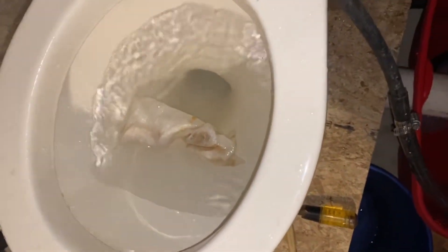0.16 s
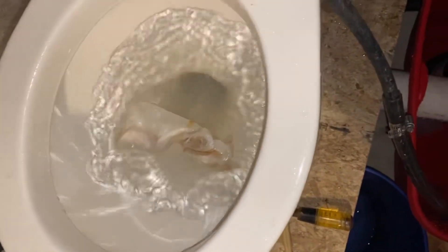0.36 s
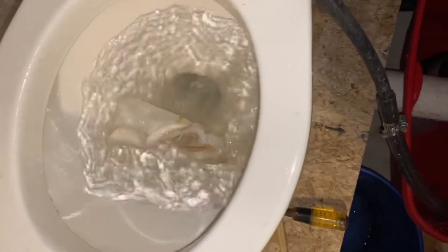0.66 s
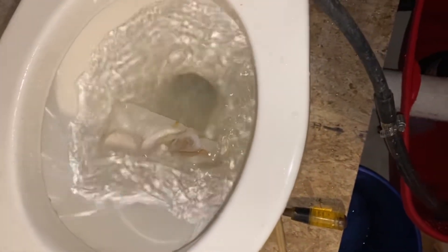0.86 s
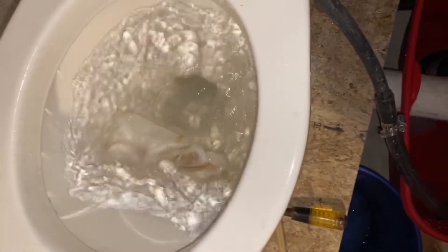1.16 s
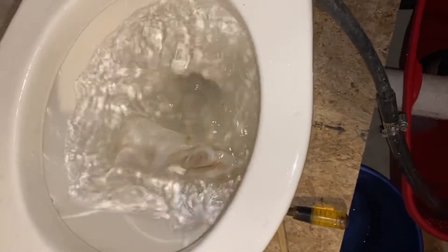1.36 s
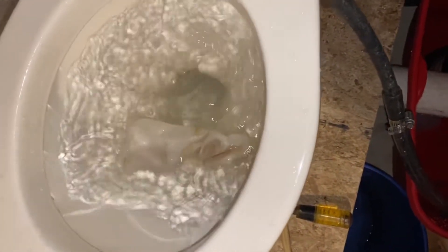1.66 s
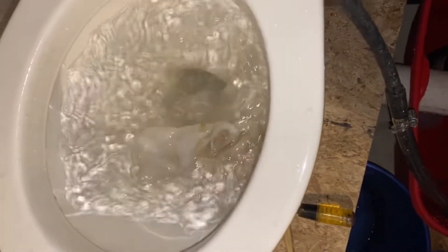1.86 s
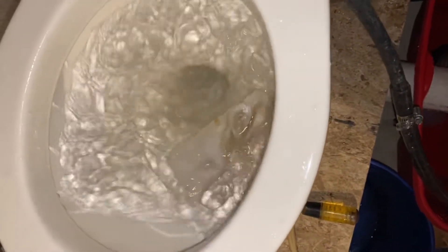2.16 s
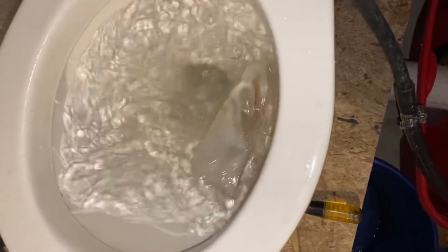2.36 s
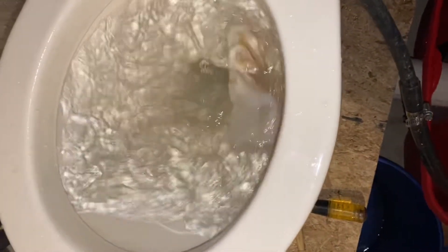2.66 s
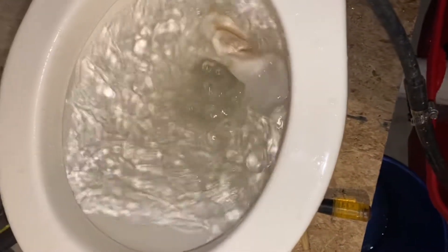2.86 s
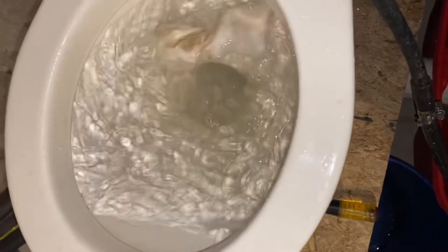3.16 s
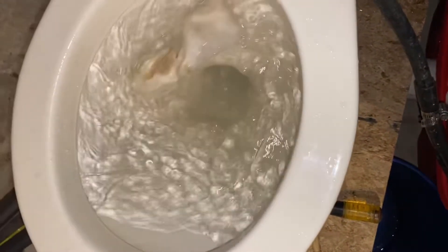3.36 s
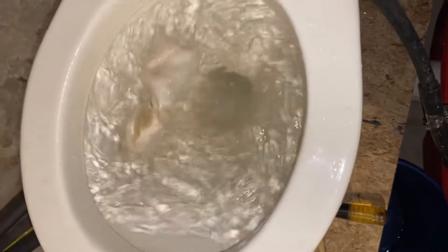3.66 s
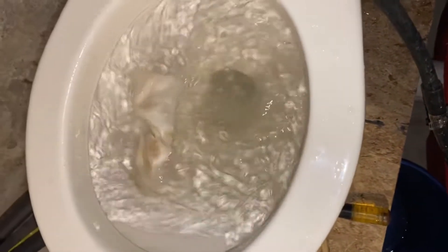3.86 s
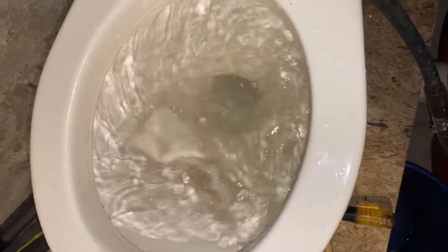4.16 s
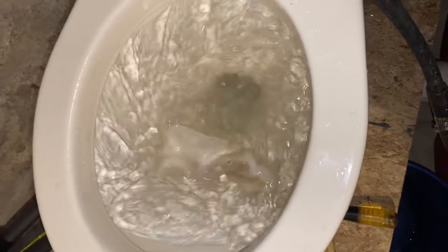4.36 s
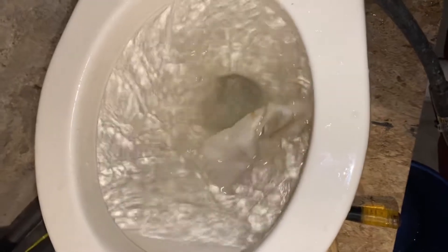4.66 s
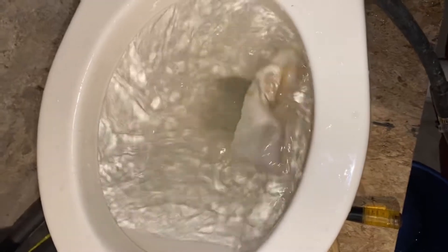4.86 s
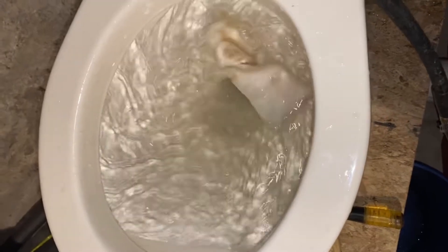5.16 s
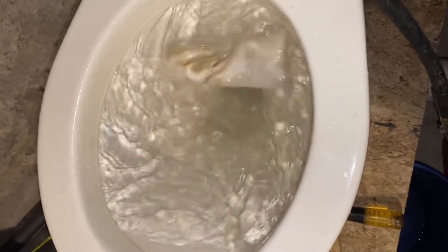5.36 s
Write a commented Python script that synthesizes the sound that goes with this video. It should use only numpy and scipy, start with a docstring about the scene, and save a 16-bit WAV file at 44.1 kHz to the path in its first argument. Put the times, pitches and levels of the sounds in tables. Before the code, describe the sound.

Close above a toilet bowl, a flush starts with fizzing water and rushing air in the rim that stops just after one second. Rough, throaty groans and gurgles come in bursts until about two and a half seconds, with splashes and slaps. Then a steadier hiss and trickle remain, with small bright bubbles and plops. A faint low machine hum lies underneath; the stereo is wide and the room small and short.

```python
"""A toilet flushes, heard by two microphone ports just above the bowl, over the faint mains hum of a machine.
From the start rim water washes down the china as fizzing noise, while the pool trickles and the bowl drones
low. In fits the stream drags air under: summed pulse partials groan roughly in the long spells, clouds of
ringing bubbles gurgle in the rest, and single bubbles plop; decaying bursts of small bubbles and noise splash
and slap. Air rushing through the rim dies away soon after one second; as the bowl fills, small bright bubbles
take over."""
import sys
import numpy as np
from scipy import signal
from scipy.fft import rfft, irfft, next_fast_len
from scipy.io import wavfile
from scipy.ndimage import uniform_filter1d

SR = 44100
rng = np.random.default_rng(int(sys.argv[2]) if len(sys.argv) > 2 else 0)


def generate_wav(signal):
    """Clip the signal to [-1, 1] and save it as 16-bit WAV at the path in sys.argv[1]."""
    frames = np.transpose(np.atleast_2d(signal))
    scaled = np.clip(frames, -1, 1) * 32767
    pcm = np.round(scaled).astype(np.int16)
    wavfile.write(sys.argv[1], SR, pcm)


N = 243431

# filling of the bowl: time_s, water_level [0-1]
WATER_LEVEL = [(0, 0), (2.2, 0.01), (3.6, 0.96), (5.52, 0.99)]
# resonances of the hollow rim channel: pitch_hz, width_hz, gain_db
RIM_CHANNEL = [(1827, 52, -3), (2215, 51, 8), (3200, 92, -10), (3480, 37, -4), (3760, 88, -3.5),
               (4020, 60, -7), (4400, 210, -5.5), (5900, 300, -18), (6500, 400, -16)]


def from_db(db):
    """Decibels to gain."""
    return np.exp(np.asarray(db) * (np.log(10) / 20))


def rms_one(x):
    """Scale to unit power."""
    return x / np.sqrt(np.mean(x ** 2) + 1e-20)


def evened(x, size=2400):
    """Hold the power of both ports at one over a sliding window of size samples; the quicker grain stays."""
    power = uniform_filter1d(np.mean(x ** 2, axis=0), size)
    return x / np.sqrt(np.maximum(power, 1e-9))


def in_time(rows):
    """The columns of a curve, read at every sample."""
    s, *columns = np.transpose(rows)
    return np.array([np.interp(np.arange(N) / SR, s, column) for column in columns])


def at_hz(points, hz):
    """Read a curve on a log-frequency axis."""
    point_hz, value = np.transpose(points)
    return np.interp(np.log(np.maximum(hz, 1)), np.log(point_hz), value)


def drift(rate_hz):
    """Slow chance with spread 1: noise through a two-pole low-pass, run at one sample in 40."""
    r = np.exp(-80 * np.pi * rate_hz / SR)
    chance = rng.standard_normal(N // 40 + 2002)
    slow = signal.lfilter([1], [1, -2 * r, r * r], chance)[2000:]   # past the filter's run-in
    return np.interp(np.arange(N) / 40, np.arange(len(slow)), rms_one(slow))


def band(x, low_hz, high_hz, order=2):
    """Butterworth band-pass."""
    edges_hz = [low_hz, min(high_hz, SR / 2 - 100)]
    return signal.sosfilt(signal.butter(order, edges_hz, "band", fs=SR, output="sos"), x)


def resonate(x, modes):
    """Parallel two-pole resonances, each with its own gain, fixed or changing in time."""
    out = 0
    x = x + 1e-12 * rng.random(N)   # keeps the filters off vanishing numbers
    for hz, width_hz, gain in modes:
        r = np.exp(-np.pi * width_hz / SR)
        zeros = np.array([1, 0, -1]) * (1 - r * r) / 2
        poles = [1, -2 * r * np.cos(2 * np.pi * hz / SR), r * r]
        out = out + gain * signal.lfilter(zeros, poles, x)
    return out


def as_modes(rows):
    """Resonances with their dB turned to gain."""
    return [(hz, width_hz, from_db(db)) for hz, width_hz, db in rows]


def add(track, at, sound):
    """Mix a sound into a track from sample at."""
    track[at:at + len(sound)] += sound[:N - at]


def bursts(rows, decay_s):
    """An envelope that jumps at each (time_s, level_db) and falls by a factor e in decay_s."""
    blows = np.zeros(N)
    for s, db in rows:
        blows[min(int(s * SR), N - 1)] += from_db(db)
    return signal.lfilter([1], [1, -np.exp(-1 / (decay_s * SR))], blows + 1e-12)


def bubble(hz, cycles, rise):
    """A bubble rings down 60 dB in so many cycles, its pitch rising as it nears the surface."""
    age = np.arange(int(cycles * SR / hz) + 2) * hz / (cycles * SR)   # 1 when it has rung down
    return np.exp(-np.log(1000) * age) * np.sin(2 * np.pi * cycles * (age + rise * age ** 2 / 2))


def cloud(per_s, low_hz, high_hz, cycles, rise, spread_db):
    """Bubbles of 96 sizes born at random moments, a few much stronger than the rest."""
    born = np.flatnonzero(rng.random(N) < per_s / SR)
    excess = np.minimum(rng.exponential(1, N), 4)
    strength = from_db(spread_db * excess) * rng.choice([-1, 1], N)
    rings = [bubble(hz, cycles, rise) for hz in np.geomspace(low_hz, high_hz, 96)]
    size = rng.integers(0, len(rings), N)
    out = np.zeros(N)
    for at in born:
        add(out, at, strength[at] * rings[size[at]])
    return rms_one(out)


def room(x, wet_db, t60=0.077):
    """Direct sound plus dense reflections that die 60 dB in t60 seconds, different at each port."""
    t = np.arange(SR // 2) / SR
    tail = rng.standard_normal((2, len(t))) * from_db(-60 * t / t60) * (t > .001)
    tail /= np.sqrt(np.sum(tail ** 2, axis=1, keepdims=True))
    return x + from_db(wet_db) * signal.fftconvolve(x[None], tail, axes=1)[:, :N]


def water_level():
    """How full the bowl is at every sample, from 0 to 1."""
    return np.clip(in_time(WATER_LEVEL)[0], 0, 1)


def in_bowl(x, direct_db, wet_db):
    """Sound from the pool rings the hollow of the bowl, whose colour changes as it fills, and spills into the room."""
    # air resonances of the bowl: pitch_hz, width_hz, low_water_db, high_water_db
    bowl_air = [(248, 14, -7.5, -24), (345, 150, 0, 0.5), (436, 52, 0, 0.5), (729, 32.4, 11.5, -52),
                (775.6, 43, -35, 7), (1113.6, 20, 5, -9), (1287, 74, -2, 5), (1398, 18, 2, 4),
                (1811, 51, 6, -1), (2105, 70, 10.5, 2.5), (2244, 160, -16, 2), (2460, 200, 5, -2),
                (3130, 15, -10, -8), (3350, 73, 0, -1), (3730, 81, -23, -9), (4345, 83, 3, 2.5)]
    fill = water_level()
    modes = [(hz, width_hz, (1 - fill) * from_db(low_db) + fill * from_db(high_db))
             for hz, width_hz, low_db, high_db in bowl_air]
    return room(resonate(x, modes) + from_db(direct_db) * x, wet_db)


def hum():
    """Steady sine lines of a machine in the room, sent alike to both ports."""
    # lines of the hum: pitch_hz, level_db (rms)
    lines = [(120, -47.5), (174, -51), (240, -39)]
    t = np.arange(N) / SR
    return sum(np.sqrt(2) * from_db(db) * np.sin(2 * np.pi * (hz * t + rng.random())) for hz, db in lines)


def swirl():
    """The turning pool trickles and plinks all the while, and the flow keeps the hollow of the bowl droning
    low."""
    # resonances of the low drone: pitch_hz, width_hz, gain_db
    drone_modes = [(61, 40, -5), (155, 30, 3), (205, 48, -2.5), (249.3, 18.5, 6)]
    trickle = cloud(per_s=300, low_hz=640, high_hz=2640, cycles=40, rise=.16, spread_db=3.8)
    plinks = cloud(per_s=60, low_hz=850, high_hz=5000, cycles=75, rise=.22, spread_db=2.8)
    drone = band(resonate(rng.standard_normal(N), as_modes(drone_modes)), 60, 340, order=3)
    return (from_db(-40.5) * rms_one(in_bowl(trickle, direct_db=-22, wet_db=4.5))
            + from_db(-41.5) * rms_one(room(plinks, wet_db=7))
            + from_db(-39.5) * evened(room(drone, wet_db=-3.5), size=9000))


def film_hiss(flicker_db, flutter_db):
    """The sheet of water on the china: half-octave noise bands that flutter together and flicker alone."""
    # colour of the hiss: pitch_hz, level_db (each band's noise, before the whole is scaled)
    hiss_colour = [(30, -30), (100, -13), (350, -17), (600, 7.5), (1200, 7.5), (2500, 5), (4200, 3.5),
                   (6500, 1.5), (8500, -1.5), (11000, -5.5), (13500, -5), (16000, -8)]
    # likeness of the hiss at the two ports: pitch_hz, likeness [0-1]
    port_likeness = [(60, .93), (300, 0.82), (600, 0.18), (2000, 0.66), (5400, 0.13), (6600, 1),
                     (16000, 0.96)]
    out = 0
    together = drift(25)
    edges_hz = 22 * 2 ** np.arange(0, 10, .5)
    white = rng.standard_normal((2, 2, N))   # neighbouring bands take turns with two pairs of noise
    for k, (low_hz, high_hz) in enumerate(zip(edges_hz, edges_hz[1:])):
        mid, side = band(white[k % 2], low_hz, high_hz)
        hz = np.sqrt(low_hz * high_hz)
        alike = np.clip(at_hz(port_likeness, hz), 0, 1)
        gain = from_db(at_hz(hiss_colour, hz) + flutter_db * together + flicker_db * drift(46))
        out = out + gain * (np.sqrt(1 + alike) * mid + np.sqrt(1 - alike) * side * [[1], [-1]])
    return rms_one(out)


def wash(flow):
    """Running water: film hiss, tinkling splashes, bursting spray and slaps."""
    tinkle = cloud(per_s=1000, low_hz=2750, high_hz=6420, cycles=12.2, rise=0.29, spread_db=7.0)
    spray = cloud(per_s=1300, low_hz=6300, high_hz=15100, cycles=12, rise=0.11, spread_db=2.0)
    tinkling = splashing(flow) * rms_one(in_bowl(tinkle, direct_db=-5.5, wet_db=4.5))
    hiss = from_db(10.5) * flow * film_hiss(flicker_db=5.0, flutter_db=2.2)
    spatter = from_db(3.5) * flow * spray + from_db(-6.0) * slaps(decay_s=0.0051)
    return tinkling + hiss + room(spatter, wet_db=-27)


def rim(flow, flutter):
    """Air and water rush through the hollow rim until it is full, and its jet sizzles while the air flutters."""
    purge_db, fade_db_per_s = 10, 5   # driven-out air relative to the flow, and its steady fading
    full_s, close_s = 1.19, 0.042   # the last air leaves; time to fall by a factor e after that
    jet_db = -46   # before the spurts and the reflections
    t = np.arange(N) / SR
    closing = np.exp(-np.maximum(t - full_s, 0) / close_s)
    purge = flow * from_db(purge_db - fade_db_per_s * t) * closing
    rush = rms_one(resonate(rng.standard_normal(N), as_modes(RIM_CHANNEL)))
    sizzle = rms_one(band(rng.standard_normal(N), 5740, 7500, order=3))
    spurts = from_db(4.9 * drift(22))
    return room(spurts * (purge * rush + from_db(jet_db) * flutter * sizzle), wet_db=0.0)


def spell(length_s, swell_s):
    """A first gulp, a swell towards full strength and a quick release."""
    first_gulp, release_s = 0.34, 0.01   # share of full strength; time to fall by a factor e
    age = np.arange(int((length_s + .1) * SR)) / SR
    swell = 1 - (1 - first_gulp) * np.exp(-age / swell_s)
    onset = np.minimum(age / 0.0015, 1)
    return onset * swell * np.exp(-np.maximum(age - length_s, 0) / release_s)


def trapped_air():
    """Over all spells of air dragged under: strength of the bubbling, of the big bubbles, and share that flutters."""
    # spells: start_s, length_s, swell_s, level_db, big_bubbles_extra_db, flutter_share [0-1 of the power]
    spells = [(0.028, 0.16, 0.024, -22, 7.5, 0.3), (0.19, 0.05, 0.0036, -21, 11, 0.65),
              (0.269, 0.07, 0.0042, -27.5, 3.5, 0.14), (0.395, 0.058, 0.0019, -22, 3.5, 0.37),
              (0.473, 0.079, 0.0077, -28.5, 13, 0.1), (0.549, 0.064, 0.0066, -21, 5.5, 0.2),
              (0.621, 0.54, 0.019, -20.5, 1.5, 0.83), (1.282, 0.055, 0.037, -19, -4.5, 0.3),
              (1.48, 0.019, 0.012, -21.5, -22, 0.14), (1.616, 0.72, 0.074, -20.5, 3, 0.84),
              (2.511, 0.2824, 0.053, -22.5, 3.5, 0.1), (2.942, 0.028, 0.011, -23, 4, 0.14),
              (3.611, 0.097, 0.012, -27, 3, 0.01), (4.235, 0.3, 0.034, -27.5, 3.5, 0.08),
              (4.553, 0.089, 0.0046, -31.5, -26, 0.1), (4.654, 0.057, 0.005, -26.5, -7, 0.06),
              (4.814, 0.017, 0.005, -26.5, -14, 0.02), (5.05, 0.047, 0.0028, -28, -2, 0.1),
              (5.143, 0.125, 0.021, -26.5, -1.5, 0), (5.437, 0.063, 0.005, -30, 1, 0.1)]
    big_grow_s = 0.009   # big bubbles swell more slowly by this much
    air, big_air, share = np.zeros((3, N))
    for s, length_s, swell_s, db, big_db, flutter in spells:
        at, shape = int(s * SR), spell(length_s, swell_s)
        add(air, at, from_db(db) * shape)
        add(big_air, at, from_db(db + big_db) * spell(length_s, swell_s + big_grow_s))
        add(share, at, flutter * shape)
    return air, big_air, np.clip(share, 0, .95)


def flutter_phase(jitter=0.01717):
    """The trapped air pulses at a slightly unsteady rate; the phase sums that rate."""
    # pulse rate, one curve for each long groan: time_s, pulses_per_s
    groan_curves = [
        [(0.03, 280), (0.17, 300), (0.22, 338)],
        [(0.4, 232), (0.45, 260), (0.52, 193), (0.58, 223)],
        [(0.63, 256), (0.68, 274), (0.73, 260), (0.79, 236), (0.84, 269), (0.93, 197), (0.99, 250), (1.04, 225),
         (1.15, 260)],
        [(1.62, 240), (1.69, 211), (1.77, 210), (1.88, 248), (1.95, 236), (2.0, 257), (2.11, 238), (2.17, 227),
         (2.23, 218), (2.35, 274)],
    ]
    rate, = in_time([point for curve in groan_curves for point in curve])
    return 2 * np.pi * np.cumsum(rate * (1 + jitter * drift(73.4))) / SR


def groan(phase, shimmer_db, second_db, slope_db, knee_hz=540):
    """The pulsing air pocket rings the bowl with two strong low partials and weaker overtones."""
    def partial(k):
        """One partial, its level shimmering on its own."""
        return np.sin(k * phase) * from_db(shimmer_db * drift(46))

    low = partial(0.99) + from_db(second_db) * partial(2)
    # quick pulses come out rounder
    low = signal.sosfilt(signal.butter(4, knee_hz, fs=SR, output="sos"), low)
    high = sum(from_db(slope_db * np.log2(k / 3)) * partial(k) for k in range(3, 7))
    low = evened(in_bowl(low, direct_db=-22, wet_db=-42.0))
    high = evened(in_bowl(high, direct_db=-14, wet_db=-11))
    return low, high


def gurgle(air, big_air, share, phase, buzz=0.27, overtone_share=0.32, lumpy_db=2.0):
    """Each spell of trapped air starts abruptly; it groans, or breaks up into three sizes of bubbles."""
    big_db, medium_db = -3.5, -1   # relative to the spell
    small_low_water_db, small_high_water_db = -16.5, 4.5   # small bubbles take over as the bowl fills
    lumps = from_db(lumpy_db * (1 - share) * drift(56))   # air that does not flutter goes under in lumps
    low, high = groan(phase, shimmer_db=3.5, second_db=0.0, slope_db=-14.5)

    big = cloud(per_s=380, low_hz=220.6, high_hz=510, cycles=16.0, rise=0.021, spread_db=4.5)
    big = evened(in_bowl(big, direct_db=-17.5, wet_db=-12))
    big = np.sqrt(1 - share) * big + np.sqrt(share) * low

    medium = cloud(per_s=520, low_hz=657, high_hz=1305, cycles=20.3, rise=0.091, spread_db=1.0)
    medium = evened(in_bowl(medium, direct_db=-12, wet_db=-38))
    clear = share * overtone_share   # the overtones are rougher: more bubbles are left among them
    medium = np.sqrt(1 - clear) * medium + np.sqrt(clear) * high

    small = cloud(per_s=490, low_hz=1520, high_hz=2730, cycles=16.0, rise=0.12, spread_db=4.0)
    small = in_bowl(small, direct_db=-22, wet_db=-7)
    small = evened(small * (1 + buzz * share * np.cos(phase)))   # shed with each pulse
    small_db = small_low_water_db + (small_high_water_db - small_low_water_db) * water_level() ** 2

    finer = from_db(medium_db) * medium + from_db(small_db) * small
    return lumps * (from_db(big_db) * big_air * big + air * finer)


def rasp(phase, uneven_db=4.5):
    """Each pulse of the flutter knocks on the air in the rim channel."""
    pulses = np.diff(np.floor(phase / (2 * np.pi)), prepend=0)
    knocks = pulses * from_db(uneven_db * drift(110))
    return room(rms_one(resonate(knocks, as_modes(RIM_CHANNEL))), wet_db=-5)


def plops():
    """Single strong bubbles near the surface ring in the bowl."""
    # loud bubbles: start_s, level_db (before the bowl), pitch_hz, ring_cycles
    loud_bubbles = [(0.124, -13, 1084, 74), (0.167, -11.5, 1056, 48), (0.428, -22, 704, 97),
                    (0.551, -15, 4270, 57), (1.338, -17.5, 4150, 52), (1.348, -17.5, 2565, 42),
                    (1.449, -24.5, 2190, 37), (1.575, -25, 1800, 26), (2.449, -24.5, 745, 15),
                    (2.853, -18, 3550, 74), (3.013, -26, 1334, 45), (3.182, -16, 3700, 38),
                    (3.369, -24, 750, 33), (3.594, -7.5, 2010, 13.5), (4.115, -24, 1250, 18),
                    (4.43, -12, 2024, 25), (4.561, -9, 1795, 36), (4.652, -13.5, 1380, 30),
                    (4.699, -14, 2000, 40), (4.817, -24.5, 752, 22), (4.828, -12, 2020, 29),
                    (4.949, -17.5, 1414, 50), (4.953, -6.5, 1967, 53), (5.025, -20.5, 1410, 54),
                    (5.047, -9, 1152, 85), (5.261, -11.5, 2260, 38), (5.305, -18.5, 2000, 36)]
    out = np.zeros(N)
    for s, db, hz, cycles in loud_bubbles:
        add(out, int(s * SR), from_db(db) * bubble(hz, cycles, rise=0.1))
    return from_db(1.5) * in_bowl(out, direct_db=-12.0, wet_db=-5.5)


def splashing(flow):
    """Envelope of the patter: it follows the flow and flares up as the stream breaks up into the pool."""
    # splashes into the pool: start_s, level_db
    pool_splashes = [(0.13, -28), (0.22, -25), (0.655, -28), (1.11, -29.5), (1.18, -31), (1.25, -31),
                     (1.485, -37.5), (1.625, -22.5), (1.96, -29.5), (2.545, -32), (2.7, -34), (2.94, -34.5),
                     (3.62, -29.5), (4.295, -27.5)]
    break_up_db = -54.5   # a flow weaker than this clings to the china and hardly splashes
    patter_db, swing_db = 8.5, -1   # relative to the flow; its unevenness
    broken = flow / np.hypot(flow, from_db(break_up_db))
    patter = broken * flow * from_db(patter_db + swing_db * drift(9.1))
    return np.hypot(patter, bursts(pool_splashes, decay_s=0.066))


def slaps(decay_s):
    """A lump of water bursts on the china into a brief spatter of noise."""
    # slaps on the china: start_s, level_db (of the envelope, before the wash is mixed)
    china_slaps = [(0.2224, -21), (0.295, -17), (0.334, -16), (0.5484, -19), (1.0337, -14.5), (1.2107, -24),
                   (1.3916, -22.5), (1.62, -17), (2.272, -16.5), (2.3518, -18.5), (2.7064, -26),
                   (2.9418, -19), (5.099, -19)]
    return bursts(china_slaps, decay_s) * rms_one(band(rng.standard_normal(N), 1500, 6000, order=1))


def scene():
    """Everything that sounds in the bowl, and the hum behind it."""
    # flow down the china, surging at first and then settling: time_s, level_db
    flow_curve = [(0, -60.5), (0.08, -46.5), (0.22, -38), (0.27, -48), (0.32, -46), (0.37, -52.5),
                  (0.45, -48), (0.68, -43), (0.97, -52), (1.15, -48), (1.37, -54), (1.58, -51.5),
                  (1.64, -50.5), (2.0, -46), (2.45, -51), (2.75, -45.5), (2.85, -51.5), (2.98, -48.5),
                  (5.52, -46)]
    flow = from_db(in_time(flow_curve)[0])
    phase = flutter_phase()
    air, big_air, flutter = trapped_air()
    rasping = from_db(-19) * air * np.sqrt(flutter) * rasp(phase)   # dB relative to the spell
    trapped = gurgle(air, big_air, flutter, phase) + rasping
    return hum() + swirl() + wash(flow) + rim(flow, flutter) + trapped + plops()


def record(dry):
    """The two ports differ in level and phase; the highest peaks are rounded and the top is cut steeply."""
    # level between the ports: pitch_hz, left_minus_right_db
    port_balance = [(100, -0.5), (240, -2), (400, 1.5), (630, -3.5), (870, 0), (1100, -4.5), (1500, -1),
                    (2000, -6.5), (2800, 4.5), (4500, 0.5), (7000, 0)]
    # phase between the ports: pitch_hz, left_lead [half turns]
    port_lead = [(550, 0), (700, .22), (950, 0), (1400, .13), (2000, .42), (2800, 1), (4300, 2), (7400, 2),
                 (8800, 1), (9550, 1), (10400, 0), (11700, 0), (12700, -1), (13800, -1), (14600, -2)]
    cutoff_hz = 15900
    size = next_fast_len(N + SR // 10)
    hz = np.arange(size // 2 + 1) * SR / size
    sides = np.array([[1], [-1]])   # each port takes half of the difference
    level = from_db(sides * at_hz(port_balance, hz) / 2)
    turn = np.exp(1j * np.pi * sides * at_hz(port_lead, hz) / 2)
    heard = irfft(rfft(dry, size) * level * turn, size)
    heard = heard / (1 + (heard / .85) ** 4) ** .25
    low_pass = 1 / np.sqrt(1 + (hz / cutoff_hz) ** 300)
    return irfft(rfft(heard) * low_pass, size)[:, :N]


dry = scene()
out = record(dry)
generate_wav(out)
```